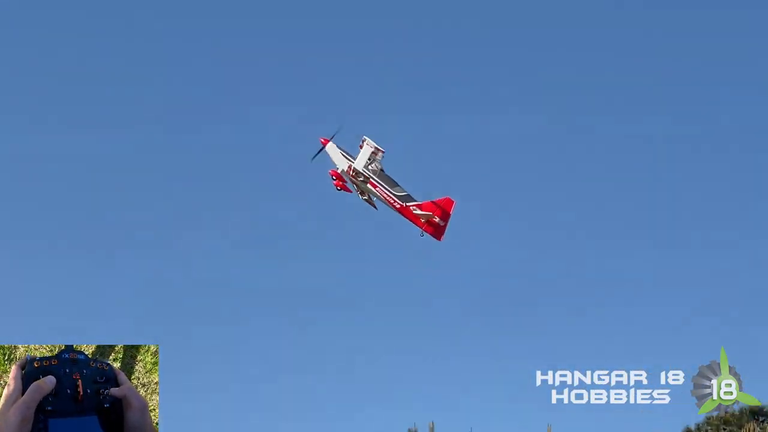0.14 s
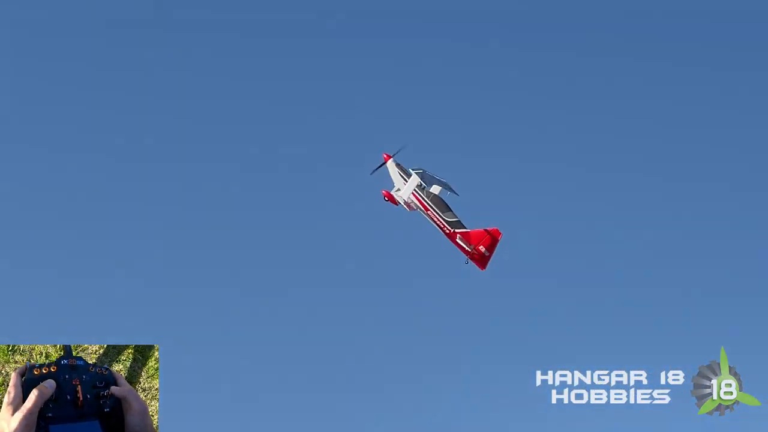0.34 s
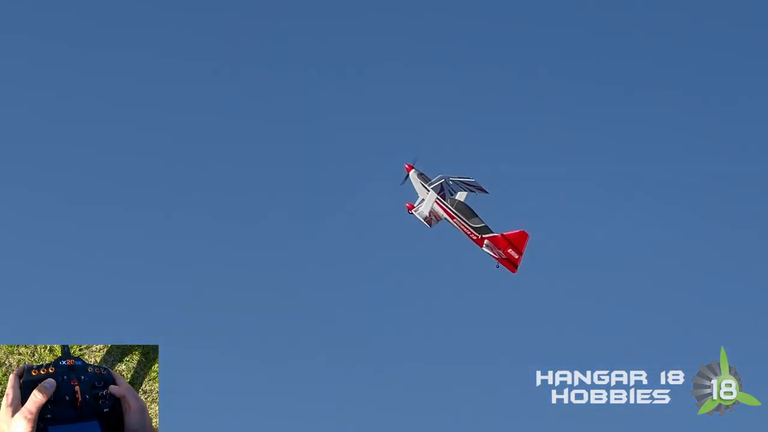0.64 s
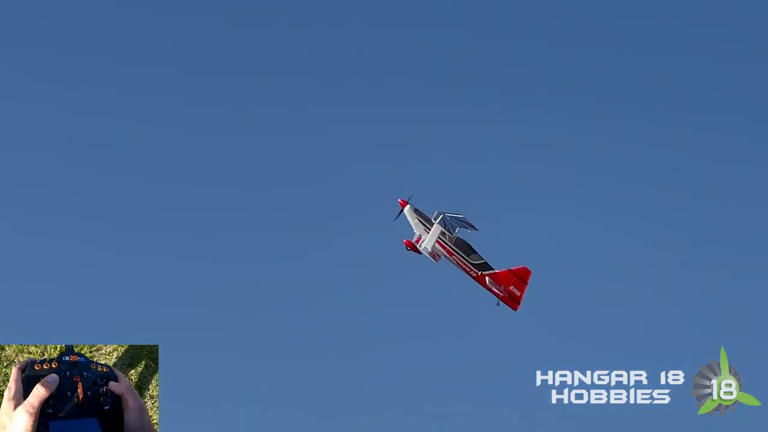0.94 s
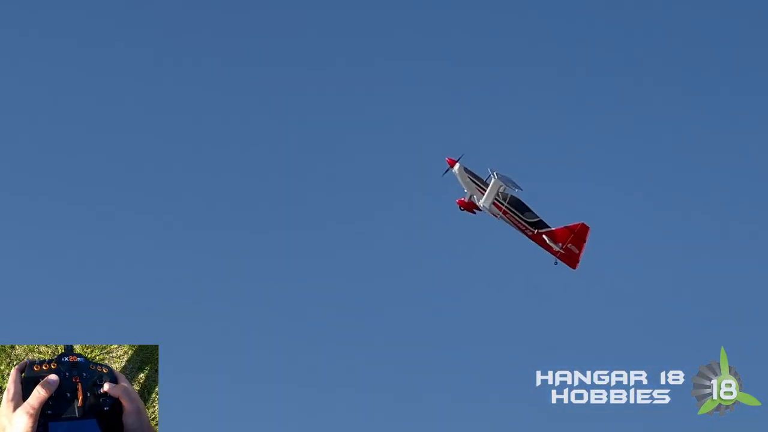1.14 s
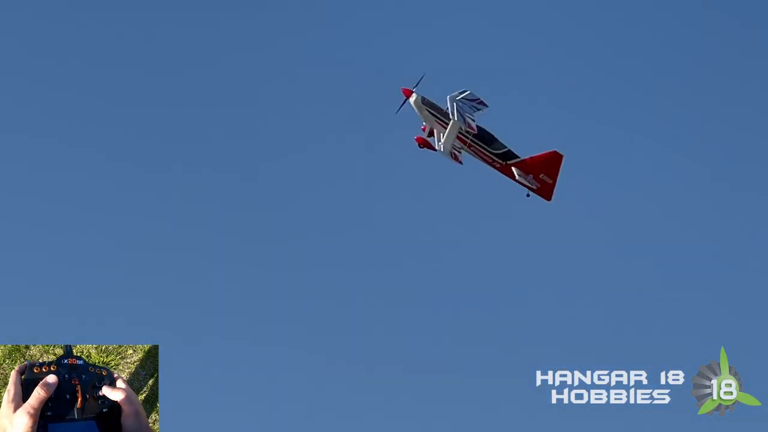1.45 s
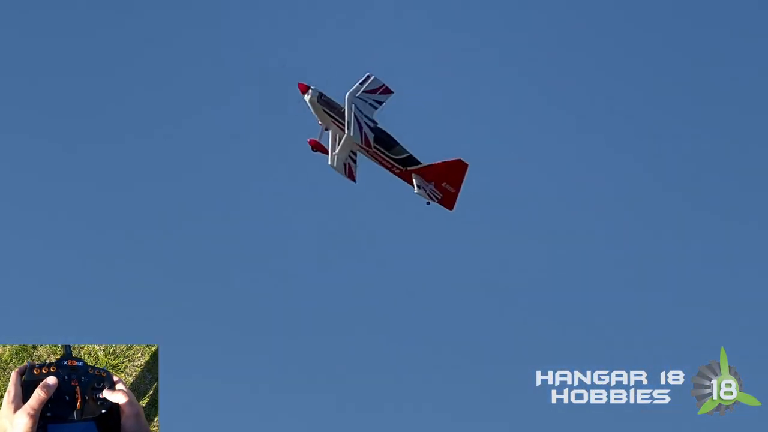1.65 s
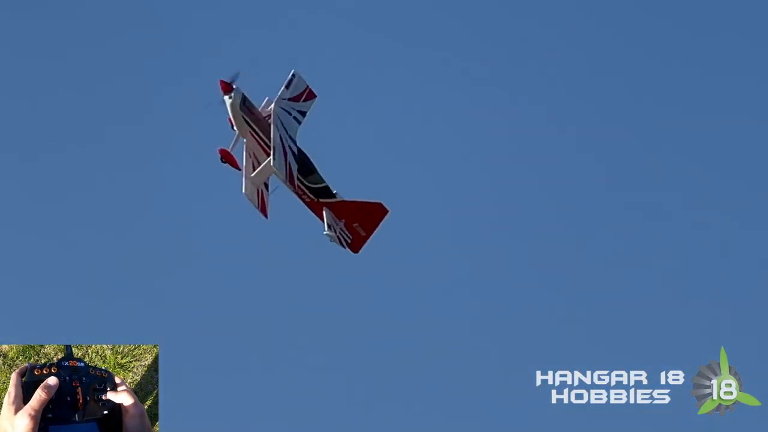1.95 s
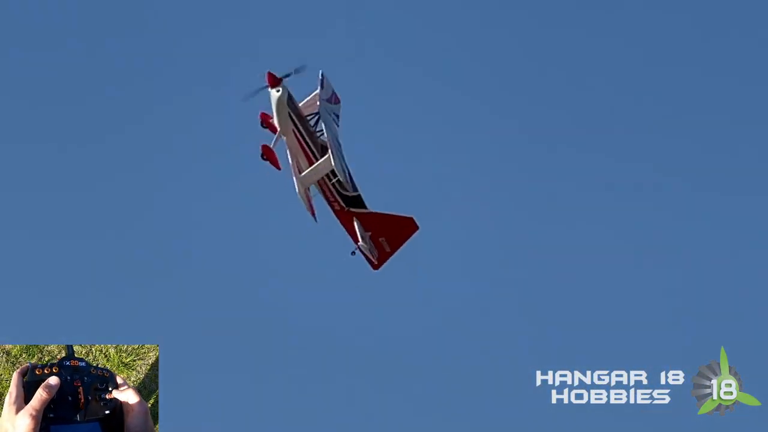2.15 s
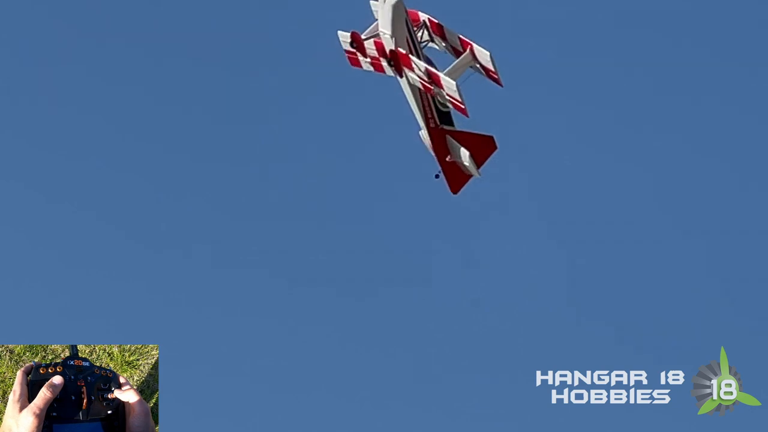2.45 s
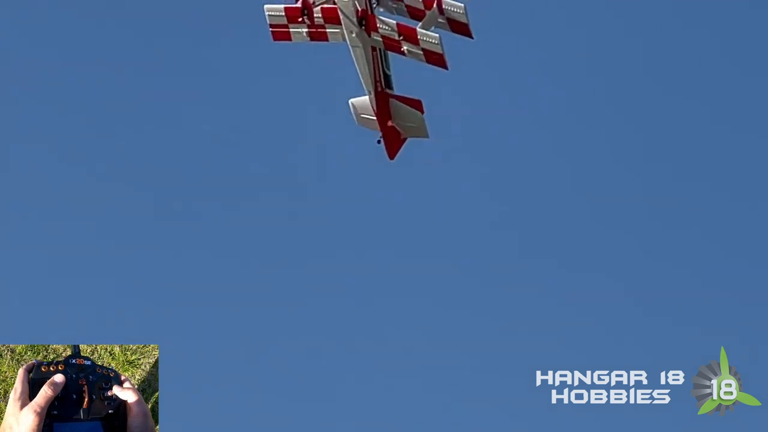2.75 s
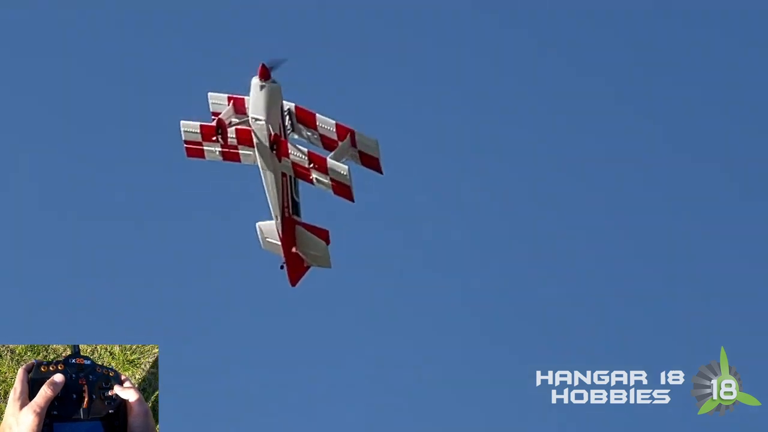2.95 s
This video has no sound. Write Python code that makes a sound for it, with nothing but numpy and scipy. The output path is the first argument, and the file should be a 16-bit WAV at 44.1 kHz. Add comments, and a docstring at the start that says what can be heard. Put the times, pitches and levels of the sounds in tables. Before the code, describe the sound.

Small electric model airplane propeller buzzes and whines upward in pitch, then holds, over wind rumble

```python
"""The propeller of a small electric model biplane hums as harmonics of the shaft while the plane throttles up,
pulls into a climb and passes overhead, outdoors; its motor whines at 42 times the shaft speed.
The blades chop noise into a buzzing hiss, combed by a delayed ground echo, and faint ticks are heard.
Wind rumbles and thumps on two microphone ports as low noise and pressure pulses.
The recorder's compressor ducks on the strong thumps."""
import sys
import numpy as np
from scipy import signal
from scipy.fft import rfft, irfft
from scipy.io import wavfile
from scipy.ndimage import uniform_filter1d, map_coordinates

SR = 44100
rng = np.random.default_rng(int(sys.argv[2]) if len(sys.argv) > 2 else 0)


def wav_out(sig):
    """Save sig, one row per channel (or a flat mono array), as 16-bit PCM at SR to the path in sys.argv[1]."""
    wavfile.write(sys.argv[1], SR, np.round(np.clip(np.atleast_2d(sig).T, -1, 1) * 32767).astype(np.int16))


N = 136710  # samples

# Higher propeller harmonics: the shaft orders (multiples of the shaft speed)
UPPER_ORDERS = [8, 9, 10, 12, 14, 21]
# Their levels: start_s, level_db of each of those orders in turn
UPPER_LEVELS = [(.3, -82, -72, -71, -68, -63, -61), (.65, -52.5, -67, -65.5, -55, -64, -54),
                (1.05, -53, -58, -49, -66, -49, -54.5), (1.45, -50.5, -65, -65, -44.5, -53, -47.5),
                (1.75, -62, -56, -57.5, -55.5, -53, -51), (2.1, -69, -65, -61, -49, -63, -58),
                (2.58, -47, -54, -63, -51, -59, -46), (2.95, -52, -46, -50, -49.5, -59, -48.5)]
# Propeller tones changing as the plane turns: start_s, level_db of shaft orders 2, 3, 4, 5, 6, 7
PROPELLER_LEVELS = [(0.4, -59, -79, -54, -66, -76, -78), (0.58, -57, -51.5, -36, -81, -72, -64),
                    (0.76, -43, -38, -40, -53, -57, -75), (0.95, -29, -39, -43, -54, -56, -51),
                    (1.18, -31, -38.5, -44.5, -64.5, -64, -49.5),
                    (1.35, -25.5, -33.5, -38.5, -78, -48.5, -42.5), (1.6, -23.5, -33, -41, -65, -36, -66),
                    (1.85, -21.5, -31, -42.5, -70.5, -35.5, -53), (2.15, -27.5, -33.5, -55, -51, -43, -45),
                    (2.35, -22.5, -34.5, -41.5, -44.5, -39, -39),
                    (2.52, -21.5, -40, -35.5, -42.5, -36, -37), (2.7, -22, -51, -32, -41, -32.5, -49),
                    (2.86, -23.5, -63, -32.5, -62, -51, -48), (3.03, -24, -45, -33, -59, -49, -43)]


def propeller(angle, hz):
    """Periodic blade loading: harmonics of the shaft, the higher ones fluttering into a rasp."""
    low = sum(tone(order * angle, order * hz, db, flutter_db=0.83, flutter_hz=12.0)
              for order, db in enumerate(curve(PROPELLER_LEVELS), 2))
    high = sum(tone(order * angle, order * hz, db, flutter_db=2.5, flutter_hz=22.3)
               for order, db in zip(UPPER_ORDERS, curve(UPPER_LEVELS)))
    return low + high


# Rotation of the propeller shaft: start_s, speed_turns_per_s
SHAFT_SPEED = [(0.0, 92.0), (0.09, 82.6), (0.43, 82.7), (0.48, 86.3), (0.55, 94.9), (0.64, 100.6),
               (0.7, 102.0), (0.78, 100.7), (0.85, 110.0), (0.92, 113.2), (0.98, 114.3), (1.1, 111.9),
               (1.16, 112.3), (1.4, 119.3), (1.5, 124.4), (1.7, 130.3), (1.9, 131.4), (2.7, 132.5),
               (3.1, 132.6)]


def shaft_speed():
    """Rotation rate sets every order's pitch: a smoothed speed curve with slight random wander."""
    smooth = uniform_filter1d(curve(SHAFT_SPEED)[0], size=1800, mode="nearest")
    return smooth * (1 + 0.00057 * drift(25))


WHINE_ORDER = 42
# Magnetic whine: start_s, level_db
WHINE_LEVELS = [(.05, -60), (.33, -52.5), (.46, -49.5), (.55, -34), (.63, -44), (.72, -53), (.82, -43.5),
                (1.15, -43), (1.45, -39.5), (1.57, -44.5), (1.68, -36.5), (2.1, -38.5), (2.32, -40),
                (2.45, -52), (2.55, -35.5), (2.64, -27.5), (2.78, -31.5), (2.87, -45), (3.05, -51)]
# Lesser motor tones: the shaft orders (multiples of the shaft speed)
MOTOR_ORDERS = [13, 28, 63]
# Their levels: start_s, level_db of each of those orders in turn
MOTOR_LEVELS = [(0, -50, -72.5, -72), (.4, -65, -68.5, -60), (.55, -62, -62, -47), (.75, -64, -61, -59),
                (.92, -49, -58, -52), (1.12, -68, -45, -47), (1.38, -57, -48.5, -69), (1.65, -56, -50, -56),
                (2, -48, -56, -76), (2.28, -54, -56, -48.5), (2.48, -52, -57, -68), (2.75, -59, -47, -48.5),
                (3.05, -55, -67, -58)]


def motor(angle, hz):
    """Magnetic tones locked to rotation: one whine and lesser orders that come and go."""
    out = tone(WHINE_ORDER * angle, WHINE_ORDER * hz, curve(WHINE_LEVELS)[0], flutter_db=1.5, flutter_hz=33.8)
    for order, db in zip(MOTOR_ORDERS, curve(MOTOR_LEVELS)):
        out = out + tone(order * angle, order * hz, db, flutter_db=2.5, flutter_hz=30)
    return out


# Left-right balance of the tones: pitch_hz, left_over_right_db
TONE_BALANCE = [(250, -1), (600, 0.8), (1700, 14), (3300, 1.5), (5500, -2), (7100, 5), (8300, 10.5)]
# Phase between the microphone ports, used by tones and rush:
# pitch_hz, left_lead_side_on_rad, left_lead_overhead_rad
PORT_PHASE = [(20, 0, 0), (300, -.05, -.1), (560, -.3, -.7), (750, -2.4, -2.1), (950, -3.7, -3.2),
              (1200, -5, -4.7), (1600, -6.3, -6.3), (1850, -6.8, -7.1), (2300, -5.4, -8.7),
              (3200, -6.1, -11.9), (3900, -6.3, -14.3), (4500, -6.3, -12), (5500, -8, -14.8),
              (6300, -7.4, -14.6), (7000, -9, -15.7), (10000, -9.2, -15.5)]


def tone(angle, hz, db, flutter_db, flutter_hz):
    """Interaural-style phase and level difference: a partial fluttering in moving air, at both ports."""
    sides = np.array([[.5], [-.5]])
    side_on, top = np.exp(1j * colour(PORT_PHASE, hz))
    above = overhead()
    lead = np.unwrap(np.angle(side_on * (1 - above) + top * above))
    level = amp(db + flutter_db * drift(flutter_hz) + sides * colour(TONE_BALANCE, hz)[0])
    phase = angle + sides * lead + rng.uniform(0, 2 * np.pi)
    return np.sqrt(2) * level * np.cos(phase)


OVERHEAD_S = (2.34, 2.5)  # start and end of the passage from side-on to overhead


def overhead():
    """Directivity changes with aspect: 0 while the plane is side-on, 1 once it is above."""
    return np.interp(np.arange(N) / SR, OVERHEAD_S, [0, 1])


CHOP = 0.12  # depth of the swell at each blade pass
PORT_LIKENESS = 0.68  # correlation of the noise at the two ports
ECHO_LEFT, ECHO_RIGHT, ECHO_RIGHT_LATER_MS = 0.43, -0.11, .37  # strength at each port, extra delay
# Rush of air off the blades: start_s, level_db
RUSH_LEVEL = [(0, -44), (.16, -41), (.3, -41), (.46, -36), (.54, -33), (.78, -31.5), (.92, -32.5),
              (1.08, -32), (1.25, -33), (1.42, -31), (1.85, -33.5), (2.2, -33.5), (2.5, -30.5),
              (2.68, -27.5), (2.85, -32), (3.1, -29)]
# Spectrum of the rush, relative levels:
# pitch_hz, side_on_left_db, side_on_right_db, overhead_left_db, overhead_right_db
RUSH_SPECTRUM = [(100, 0.5, -5, 8.5, 3), (370, -4, 8, 0.5, -4.5), (680, -5.5, -14.5, -3, 1.5),
                 (940, 0.5, -1, -2.5, -4.5), (1380, -5, -1, -2.5, -2), (1860, -1, -8, -3.5, -8),
                 (2200, 0, -8, 4.5, -15.5), (3000, -4.5, -7, -7, -4), (3400, -5.5, -10, -3, -5.5),
                 (4000, -4, -9, -8.5, -18), (5160, -5, -7, -1.5, -4.5), (5240, -11.5, -7.5, -14, -0.5),
                 (6100, -13, -12, -8.5, -18), (7040, -13, -13.5, -8.5, -6.5),
                 (7760, -11.5, -13, -8.5, -21.5), (9840, -25, -30.5, -20.5, -28),
                 (10860, -44, -33.5, -35, -37), (11300, -44, -44, -40, -35.5),
                 (13000, -41, -45.5, -35.5, -40), (15000, -52.5, -51.5, -49, -57)]
# Narrow humps in the rush, perhaps the hollow airframe: pitch_hz, width_hz, side_on_db, overhead_db
RUSH_HUMPS = [(1120, 41, 0, -3), (1473, 160, 4.5, 4.5), (1617, 100, 5.5, 3.5), (2212, 43, 6, -6),
              (3560, 250, 3.5, 4.5), (4300, 180, 2.5, -2.5)]
# Ground echo falling behind as the plane climbs: start_s, delay_ms
ECHO_DELAY = [(0, 2.66), (.5, 2.68), (.95, 2.62), (1.7, 2.73), (2, 2.85), (2.3, 3.07), (2.62, 3.44),
              (3.1, 4.1)]


def rush(angle):
    """Modulated turbulence: noise and buzz swept by the blades, comb-filtered by the ground echo."""
    f, above = np.fft.rfftfreq(N, 1 / SR), overhead()
    swell = 1 + CHOP * np.cos(2 * angle) + 0.18 * np.cos(angle) + 0.26 * np.cos(3 * angle)
    shared, separate = rng.standard_normal((2, N)) * swell
    right_noise = PORT_LIKENESS * shared + np.sqrt(1 - PORT_LIKENESS ** 2) * separate
    lines, delay_ms = buzz(angle), curve(ECHO_DELAY)[0]
    left = rfft(with_ground(shared + lines, delay_ms, ECHO_LEFT))
    right = rfft(with_ground(right_noise + lines, delay_ms + ECHO_RIGHT_LATER_MS, ECHO_RIGHT))

    humps_db = sum(np.outer(db, np.exp(-(2 * (f - hz) / width) ** 2)) for hz, width, *db in RUSH_HUMPS)
    # axes: aspect, port, frequency
    gains = amp(colour(RUSH_SPECTRUM, f).reshape(2, 2, -1) + humps_db[:, None])
    aspects = []
    for lead, gain in zip(colour(PORT_PHASE, f), gains):
        ports = np.array([left, right * np.exp(-1j * lead)])
        aspects.append(unit(irfft(ports * gain, N)))
    side_on, top = aspects
    return (side_on * (1 - above) + top * above) * amp(curve(RUSH_LEVEL)[0] + 1.0 * drift(20))


BUZZ_ORDERS = (8, 46)  # first shaft order, and the one past the last
BUZZ_DB, BUZZ_DB_PER_OCTAVE, BUZZ_FLUTTER_DB = -28.5, -1.5, 3  # first order's level before rush shaping


def buzz(angle):
    """Periodic turbulence is a line spectrum: many weak orders, each fading in and out."""
    out = np.zeros(N)
    for order in range(*BUZZ_ORDERS):
        db = BUZZ_DB + BUZZ_DB_PER_OCTAVE * np.log2(order / BUZZ_ORDERS[0])
        level = amp(db + BUZZ_FLUTTER_DB * drift(6.6))
        out += level * np.cos(order * angle + rng.uniform(0, 2 * np.pi))
    return out


def with_ground(x, delay_ms, share):
    """Interference with a delayed reflection: the ground echo combs the spectrum."""
    delayed = map_coordinates(x, [np.arange(N) - delay_ms * SR / 1000], order=3, mode="wrap")
    return x + share * delayed


TICK_S = 0.0027  # decay time constant
# Faint ticks, levels before the band-pass: start_s, level_db, left_over_right_db
TICKS = [(.758, -29, -2), (1.132, -26.5, 3)]


def ticks():
    """Exponentially decaying noise, band-passed: short dry snaps."""
    t, envelope = np.arange(N) / SR, np.zeros((2, N))
    for s, db, pan_db in TICKS:
        port_level = amp(db + pan_db * np.array([[.5], [-.5]]))
        envelope += port_level * (t >= s) * np.exp(-abs(t - s) / TICK_S)
    band = signal.butter(5, [1500, 7200], "band", fs=SR, output="sos")
    return signal.sosfilt(band, 2 * envelope * rng.standard_normal((2, N)))


PUFF_S, PUFF_HZ = 0.014, 206  # Gaussian width of a puff, corner of its falling spectrum
# Wind on the ports: start_s, level_db
WIND_LEVEL = [(0, -2), (.15, -2), (.23, -3.5), (.32, -2.5), (.46, -4.5), (.53, -8.5), (.75, -13.5),
              (.87, -9), (1.05, -13.5), (1.25, -16.5), (1.65, -18.5), (1.8, -19.5), (2.05, -15),
              (2.22, -17.5), (2.45, -14), (2.6, -21), (3.1, -21.5)]
# Spectrum of the rumble, relative density: pitch_hz, density_db_per_hz
RUMBLE_SPECTRUM = [(15, -6.5), (45, 5), (70, -1.5), (120, -11), (150, -20.5), (200, -33.5), (300, -42),
                   (500, -58.5), (1000, -58.5), (3000, -87.5), (12000, -130)]
# Single buffets, levels on the louder side (width is the Gaussian sigma):
# centre_s, peak_db, width_s, left_over_right_db, puff_db
BUFFETS = [(.107, -11, .003, 1, -23), (0.2, 7, 0.0022, -3, -10.5), (0.227, 0.5, 0.0032, 1, -20),
           (0.244, 11.5, 0.0019, 4, -6), (0.301, 9.5, 0.0024, -1.5, -9), (0.359, -12, 0.0018, -1, -12),
           (0.387, 4, 0.0016, 6, -13.5), (0.409, 10, 0.0034, 1.5, -39), (.478, 11, 0.0026, -2, -29),
           (0.658, 4, 0.0025, -6.5, -44.5), (0.802, 5, 0.0028, -4, -25), (1.151, 3.5, 0.0038, -8.5, -45),
           (1.42, -1, 0.0025, -10, -41), (2.172, -7, 0.0033, -4, -21), (2.204, 2.5, 0.0024, -7, -18),
           (2.325, 0, 0.0023, -32, -31), (2.441, 3.5, 0.0027, -8.5, -37), (2.801, 0, 0.0028, 9, -40)]


def wind():
    """Turbulent pressure on the ports: separate low rumble, and Gaussian pushes with puffs of eddies."""
    f, t = np.fft.rfftfreq(N, 1 / SR), np.arange(N) / SR
    rumble = unit(irfft(rfft(rng.standard_normal((2, N))) * amp(colour(RUMBLE_SPECTRUM, f)), N))
    lumps_db = 2.1 * np.array([drift(11.0), drift(18)])
    out = rumble * amp(curve(WIND_LEVEL)[0] + lumps_db)
    eddies = unit(irfft(rfft(rng.standard_normal((2, N))) / (1 + (f / PUFF_HZ) ** 4), N))
    for s, db, width, pan_db, puff_db in BUFFETS:
        push = amp(db) * np.exp(-.5 * ((t - s) / width) ** 2)
        puff = amp(puff_db) * np.exp(-.5 * ((t - s) / PUFF_S) ** 2) * eddies
        # only the weaker side is turned down
        out = out + amp(np.minimum([[pan_db], [-pan_db]], 0)) * (push + puff)
    return out


def amp(db):
    """The decibel law: level to amplitude gain."""
    return 10 ** (np.asarray(db) / 20)


def unit(x):
    """Energy normalisation: scales to rms 1."""
    return x / np.sqrt(np.mean(x ** 2) + 1e-20)


def curve(rows):
    """Linear interpolation in time: one line for each column after the first."""
    t, *cols = np.transpose(rows)
    return np.array([np.interp(np.arange(N) / SR, t, c) for c in cols])


def colour(rows, hz):
    """Interpolation on a log-frequency axis: each column after the first, read at hz."""
    f, *cols = np.transpose(rows)
    return np.array([np.interp(np.log(hz + 1), np.log(f + 1), c) for c in cols])


def drift(rate_hz):
    """Low-passed Gaussian noise: slow random wander of rms 1."""
    f = np.fft.rfftfreq(N, 1 / SR)
    low_pass = np.exp(-(f / rate_hz) ** 2) * (f > 0)
    return unit(irfft(rfft(rng.standard_normal(N)) * low_pass, N))


def scene():
    """Superposition: one shaft drives propeller, motor and rush; ticks and wind are added."""
    hz = shaft_speed()
    angle = 2 * np.pi * np.cumsum(hz) / SR
    return propeller(angle, hz) + motor(angle, hz) + rush(angle) + ticks() + wind()


RECOVER_DB_PER_S = 26.5


def held_db(x):
    """Peak detection: a level that rises at once and falls back slowly."""
    fall = np.arange(N) * RECOVER_DB_PER_S / SR
    peak_db = 20 * np.log10(abs(x).max(0) + 1e-9)
    return np.maximum.accumulate(peak_db + fall) - fall


KNEE_DB, SQUEEZE, CEILING_DB = -4.5, 0.59, -1  # SQUEEZE: dB of ducking per dB above the knee
LOW_CUT_HZ, EDGE_HZ, FADE_S = 14.9, 15600, .006


def record(dry):
    """Level-dependent gain: a fade-in, low cut, quick compressor with a ceiling, and band limit."""
    dry = dry * np.sin(np.pi / 2 * np.minimum(np.arange(N) / SR / FADE_S, 1)) ** 2
    cut = signal.sosfilt(signal.butter(2, LOW_CUT_HZ, "high", fs=SR, output="sos"), dry)
    squeeze_db = SQUEEZE * np.maximum(held_db(dry) - KNEE_DB, 0)
    duck_db = np.maximum(squeeze_db, held_db(cut) - CEILING_DB)
    smooth_db = uniform_filter1d(uniform_filter1d(duck_db, size=200), size=200)
    ducked = cut * amp(-smooth_db)
    band_limit = signal.firwin(511, EDGE_HZ, window=("kaiser", 9), fs=SR)
    return signal.oaconvolve(ducked, band_limit[None], "same")


dry = scene()
out = record(dry)
wav_out(out)
```